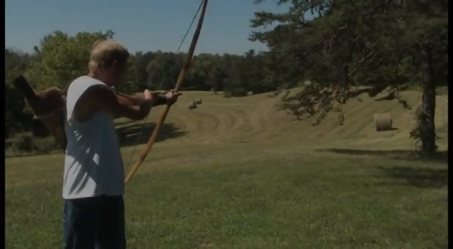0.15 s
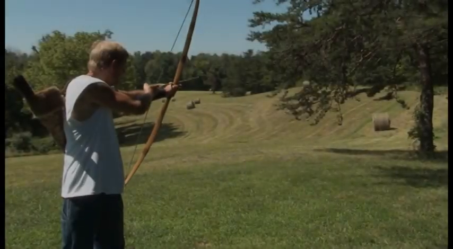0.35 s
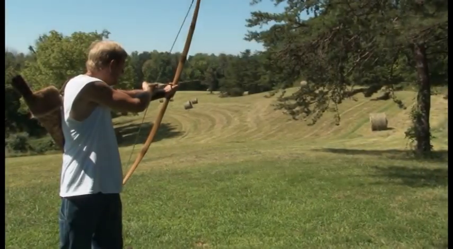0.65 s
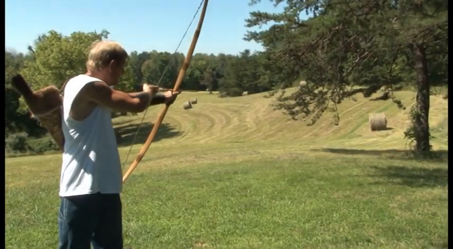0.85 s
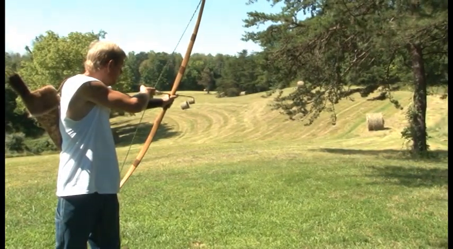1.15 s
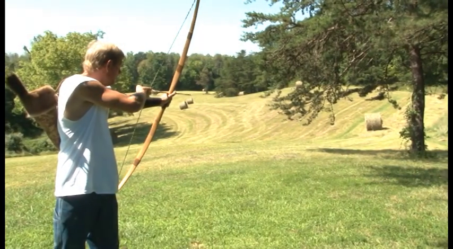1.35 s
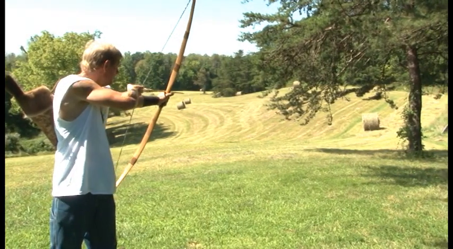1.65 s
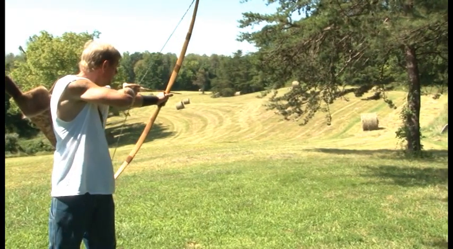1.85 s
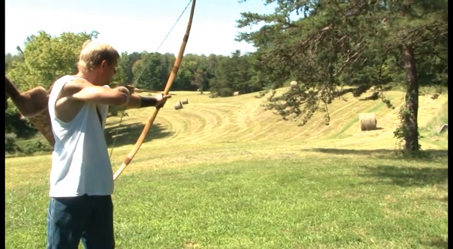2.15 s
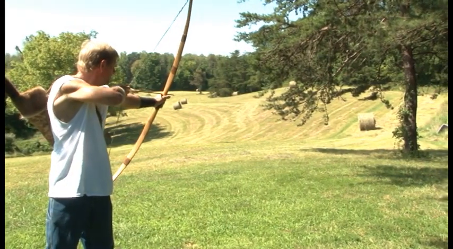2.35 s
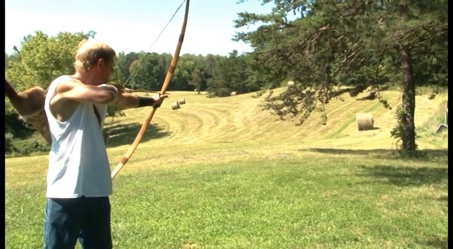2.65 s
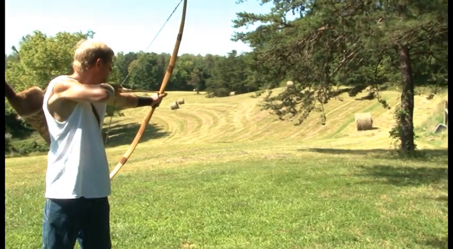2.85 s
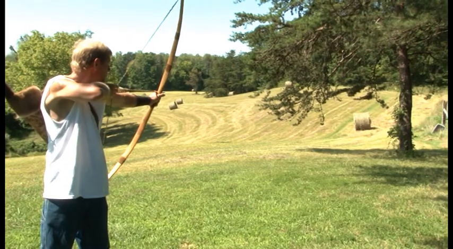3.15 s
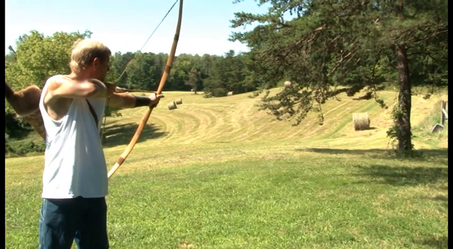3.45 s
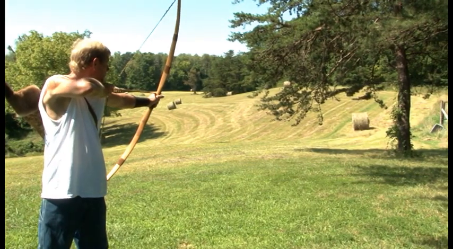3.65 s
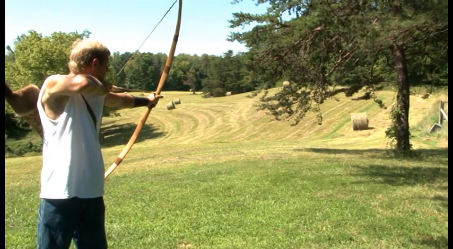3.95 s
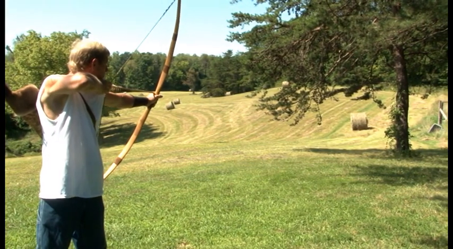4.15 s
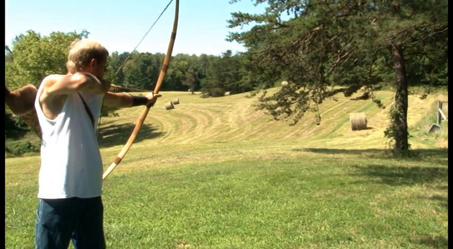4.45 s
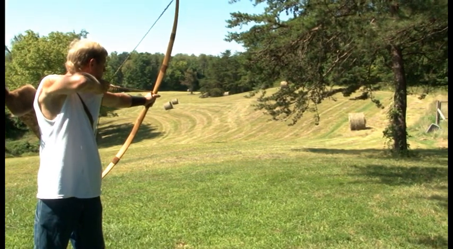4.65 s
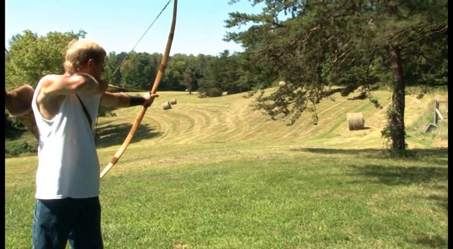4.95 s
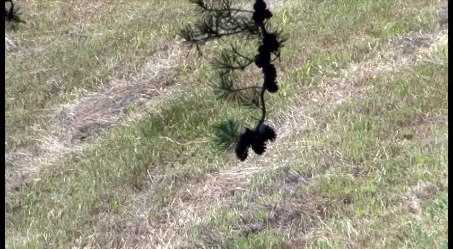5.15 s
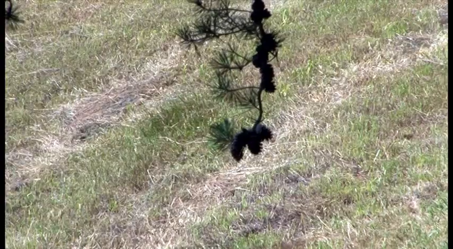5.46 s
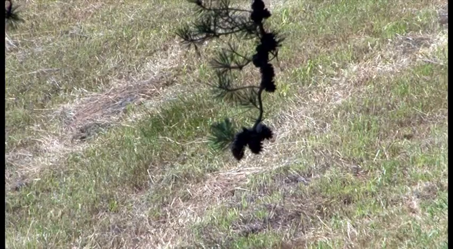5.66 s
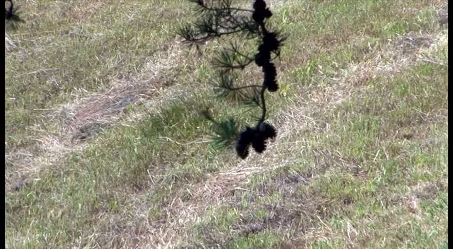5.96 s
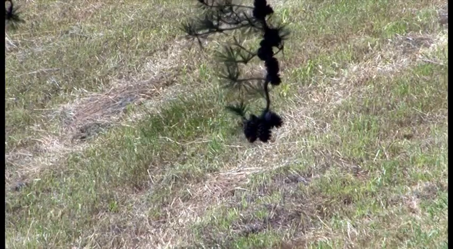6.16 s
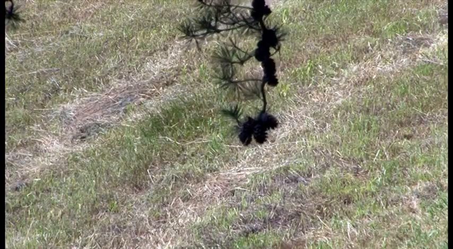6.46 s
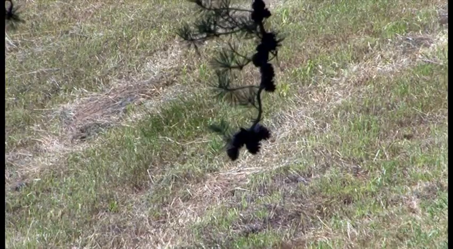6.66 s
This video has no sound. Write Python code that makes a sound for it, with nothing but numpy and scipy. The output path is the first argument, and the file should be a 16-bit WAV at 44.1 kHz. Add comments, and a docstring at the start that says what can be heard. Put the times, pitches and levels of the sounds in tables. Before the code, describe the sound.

A high chorus of insects swells in outdoors, with dull wind buffets on the microphone that ease near the end.

```python
"""A summer hayfield swells in: a wide cicada chorus hisses, one near cicada buzzes its drums, a katydid
rasps its wings and a camera's lens motor ticks faintly in its housing. An arrow swishes as it is drawn,
gusts rumble and thump on the microphone, and the katydid adds lone ticks. At 5.2 s the place changes:
the wind drops, far machinery drones and another cicada sings. Mono."""
import sys
import numpy as np
from scipy import signal
from scipy.fft import rfft, irfft
from scipy.io import wavfile
from scipy.ndimage import uniform_filter1d

SR = 44100
rng = np.random.default_rng(int(sys.argv[2]) if len(sys.argv) > 2 else 0)


def transcribe(signal):
    """Save signal, clipped to [-1, 1], as a 16-bit WAV file at the path in sys.argv[1]."""
    frames = np.atleast_2d(signal).T
    limited = np.clip(frames, -1, 1)
    pcm = np.round(limited * 32767).astype(np.int16)
    wavfile.write(sys.argv[1], SR, pcm)


N = 300556
T = np.arange(N) / SR
MOVE_S = 5.225   # change of place
AT_FIRST_PLACE = T < MOVE_S
FIRST_PLACE_FADE = np.clip((MOVE_S + 0.024 - T) / 0.041, 0, 1)   # quick crossfade, 1 to 0

# Opening swell: time_s, gain_db
FADE_IN = [(0, -28), (.38, -18.5), (.6, -14), (.85, -10.5), (1.07, -7), (1.25, -5), (1.4, -2.5)]
# Colour of the insect hiss at the first place: frequency_hz, level_db
FIRST_HISS = [(1120, -32.5), (1900, -30.5), (2590, -18), (2800, -17.5), (3580, -8.5), (4200, -10),
              (5190, -6.5), (5920, -6), (6520, -1), (7000, -3), (7780, -3.5), (8350, -5.5), (9040, -11.5),
              (9960, -11.5), (15600, -22)]


def from_db(db):
    """Gain of a level."""
    return 10 ** (np.asarray(db) / 20)


def rms_one(x):
    """Scale to unit rms."""
    return x / np.sqrt(np.mean(x ** 2) + 1e-20)


def in_time(rows):
    """Columns of a curve table, one value per sample."""
    times, *columns = np.transpose(rows)
    return [np.interp(T, times, column) for column in columns]


def noise(spectrum, low_hz=10, high_hz=20000):
    """Noise of the given colour between two steep edges; rms 1."""
    hz, points = np.fft.rfftfreq(N, 1 / SR) + .1, np.array(spectrum)
    colour = from_db(np.interp(np.log(hz), np.log(points[:, 0]), points[:, 1]))
    edge_loss = np.sqrt((1 + (low_hz / hz) ** 24) * (1 + (hz / high_hz) ** 24))
    return rms_one(irfft(rfft(rng.standard_normal(N)) * colour / edge_loss, N))


def drift(rate_hz):
    """A slow random wander; rms 1."""
    lowpass = signal.butter(2, rate_hz, fs=SR, output="sos")
    return rms_one(signal.sosfilt(lowpass, rng.standard_normal(N + SR))[SR:])


def evened(x, share):
    """Flatten part of a narrow noise's own swell, so that gusts set its shape."""
    envelope = uniform_filter1d(np.abs(signal.hilbert(x)), size=441)
    return rms_one(x / (envelope + 0.23) ** share)


def ring(clicks, hz, t60_s):
    """A unit click sets a sine of height 1 ringing."""
    decay, angle = from_db(-60 / (t60_s * SR)), 2 * np.pi * hz / SR
    return signal.lfilter([0, np.sin(angle)], [1, -2 * decay * np.cos(angle), decay ** 2], clicks + 1e-18)


def body(drive, modes):
    """Resonances in parallel, each passed twice for dark valleys; rms 1."""
    out = 0
    for k, (hz, width_hz, db) in enumerate(modes):
        t60_s = np.log(1000) / (np.pi * width_hz)
        out += (-1) ** k * from_db(db) * rms_one(ring(ring(drive, hz, t60_s), hz, t60_s))
    return rms_one(out)


def pulses(rate_hz, jitter_s):
    """One unit click per cycle, each a little early or late."""
    at = np.flatnonzero(np.diff(np.floor(np.cumsum(rate_hz) / SR)))
    slip = np.round(jitter_s * SR * rng.standard_normal(N)[at]).astype(int)
    clicks = np.zeros(N)
    clicks[np.clip(at + slip, 0, N - 1)] = 1
    return clicks


def echoed(x):
    """The direct sound and its early echoes off ground and branches; rms 1."""
    # Reflections: delay_s, gain_db
    echoes = [(.0021, -8.5), (.0047, 0.5), (0.0102, -32), (.0190, -24)]
    return rms_one(x + sum(from_db(db) * np.roll(x, round(delay_s * SR)) for delay_s, db in echoes))


def far_cicadas():
    """Countless far cicadas merge into smooth noise, in bands that flicker separately."""
    # Colour of the hiss at the second place: frequency_hz, level_db
    second_hiss = [(1120, -32), (1900, -31), (2540, -23.5), (2700, -19.5), (3340, -11), (4750, -7),
                   (5420, -7.5), (5920, -7), (6410, -5.5), (7000, -5), (7510, -1.5), (7920, -0.5),
                   (9360, -15.5), (14800, -22), (15600, -23)]
    skirt_db = np.where(AT_FIRST_PLACE, -13.5, -10)
    top_db = np.where(AT_FIRST_PLACE, -20, -19) + .8 * drift(30)
    out = np.zeros(N)
    for low_hz, high_hz, db in [(10, 4310, skirt_db), (4490, 8780, -0.33), (9900, 19400, top_db)]:
        gain = from_db(db + .5 * drift(9.7))
        first, second = noise(FIRST_HISS, low_hz, high_hz), noise(second_hiss, low_hz, high_hz)
        out += gain * np.where(AT_FIRST_PLACE, first, second)
    return out + from_db(-11) * ~AT_FIRST_PLACE * noise(second_hiss, 9270, 10650)


def near_cicada():
    """Two drums click into a resonant body and throb as they beat against each other."""
    # Pace of the drums: time_s, click_rate_hz, throb_rate_hz
    pace = [(0, 363.7, 46.8), (2.3, 363, 47), (3.1, 361.5, 47.2), (3.7, 357, 47.6), (4.3, 349, 47.4),
            (4.8, 339, 46), (5.2, 332, 45.5)]
    # Level relative to the chorus: time_s, level_db
    levels = [(0, -9), (1.2, -7), (2.5, -8), (3.4, -6), (4.0, -11.5), (4.5, -10), (5.2, -20)]
    # Body resonances: pitch_hz, width_hz, level_db
    modes = [(5370, 590, 4), (5850, 140, 2), (6650, 790, -9), (7200, 840, 10.5)]
    click_hz, throb_hz = in_time(pace)
    throb = (.5 + .5 * np.cos(2 * np.pi * np.cumsum(throb_hz) / SR)) ** 4.3 + 0.042
    clicks = pulses(click_hz * (1 + .001 * drift(4)), jitter_s=.000012)
    clicks *= throb * (1 + 0.13 * rng.standard_normal(N))
    return from_db(in_time(levels)[0]) * echoed(body(clicks, modes))


def second_cicada():
    """A steady buzz: the left drum clicks and the right follows, softer, into the same body."""
    # Body resonances: pitch_hz, width_hz, level_db
    modes = [(5750, 500, -5), (7080, 360, 2.5), (7470, 210, -0.5), (8330, 560, -4), (9220, 330, -4.5),
             (10500, 900, -25)]
    click_hz, right_lag_s = 185.5, 0.0029
    left = pulses(click_hz * (1 + .0006 * drift(2.2)), jitter_s=.00001)
    left *= 1 + 0.15 * rng.standard_normal(N)
    right = 0.46 * np.roll(left, round(right_lag_s * SR))
    return from_db(-4.5 + 1.2 * drift(0.52)) * echoed(body(left + right, modes))


def chorus():
    """Far cicadas, one close singer at each place, a cricket and the air, all riding one level curve."""
    # Chorus level, one list per place: time_s, level_db
    levels = [
        [(0, -30), (1.4, -29.5), (1.67, -28.5), (2.25, -29), (3.2, -29.5), (4.8, -30), (5.2, -30)],
        [(5.24, -33), (6.8, -33.5)],
    ]
    gain = from_db(in_time(sum(levels, []))[0] + in_time(FADE_IN)[0])
    hiss = far_cicadas()
    singer = np.where(AT_FIRST_PLACE, near_cicada(), second_cicada())
    return gain * (hiss + singer + cricket() + air_murmur())


def wind_strength():
    """An eddying breeze and gusts add in power; gives the gains of heave, rumble, flutter and buffet."""
    # Breeze, one list per place: time_s, rumble_db, flutter_db
    breeze = [
        [(0, -66, -75), (.56, -61, -65.5), (.65, -50.5, -60), (.9, -52, -59), (1.1, -48, -50),
         (1.65, -51, -46.5), (1.85, -40.5, -46), (2.2, -43, -51.5), (2.7, -42, -55), (3.3, -48, -51),
         (3.5, -40.5, -44), (3.73, -57, -49), (3.8, -44, -49), (4.0, -51.5, -49), (4.15, -40.5, -47),
         (4.24, -52, -50), (4.6, -56, -51.5), (4.8, -50, -49), (5.2, -42.5, -51)],
        [(5.25, -51, -58), (5.6, -52, -65), (6.05, -56, -65), (6.5, -53, -66), (6.8, -56, -56)],
    ]
    # Gusts: centre_s, length_s, heave_db, rumble_db, flutter_db
    gusts = [(0.14, 0.03, -55, -64, -64), (0.254, 0.027, -51, -47.5, -58), (0.371, 0.053, -48, -45.5, -46),
             (0.612, 0.037, -51, -58, -57), (0.882, 0.084, -60, -42.5, -61),
             (1.278, 0.056, -37, -33.5, -56), (1.804, 0.067, -39, -44, -53), (2.004, .035, -38, -22, -32.5),
             (2.04, 0.019, -20, -15.5, -30.5), (2.087, 0.037, -35, -40, -50), (2.321, 0.025, -35, -33, -52),
             (2.346, 0.033, -45, -42, -50), (2.512, 0.03, -38, -37, -55), (2.91, 0.022, -47, -40, -59),
             (2.998, 0.022, -37, -38, -42), (3.173, 0.065, -32, -28, -43.5),
             (3.565, 0.016, -46, -25.5, -42), (3.647, .045, -30, -39, -45), (3.862, 0.074, -32, -35, -51),
             (3.934, 0.02, -37, -36, -43.5), (4.077, 0.054, -33.5, -32, -44),
             (4.151, 0.057, -35, -34, -41.5), (4.422, 0.038, -54, -40.5, -49.5),
             (4.824, 0.071, -35, -40.5, -53), (4.956, 0.051, -36, -32, -54),
             (5.115, 0.072, -28, -26, -41.5), (5.213, 0.019, -34, -25, -30),
             (5.397, 0.028, -43, -45, -55.5), (5.845, 0.039, -49, -48, -61),
             (6.298, 0.054, -37.5, -61, -56), (6.468, 0.17, -42, -43.5, -57)]
    eddy_db, eddy_hz = 4, 8.8
    rise, fall = 0.99, 0.65   # shares of its length: a gust builds slowly and stops short
    low_db, breeze_flutter_db = in_time(sum(breeze, []))
    steady_db = [low_db, low_db, breeze_flutter_db, -64 + in_time(FADE_IN)[0]]
    eddies_db = [share * eddy_db * drift(eddy_hz) for share in (1.2, 0.9, 0.37, .6)]
    power = from_db(np.add(steady_db, eddies_db)) ** 2
    for centre_s, length_s, heave_db, rumble_db, flutter_db in gusts:
        span = slice(max(round((centre_s - 2 * length_s) * SR), 0), round((centre_s + 2 * length_s) * SR))
        age_s = T[span] - centre_s
        half_width_s = length_s / 2 * np.where(age_s < 0, rise, fall)
        fade_db = np.interp(centre_s, *np.transpose(FADE_IN))
        buffet_db = 1.07 * (flutter_db - fade_db + 16.5) - 31.5 + fade_db   # grows faster than flutter
        peak_power = from_db([heave_db, rumble_db, flutter_db, buffet_db]) ** 2
        power[:, span] += peak_power[:, None] * .5 ** ((age_s / half_width_s) ** 2)
    return np.sqrt(power)


def wind():
    """Pressure noise on the microphone, from low to high: heave, rumble, flutter and buffet."""
    # Colour of the low wind: frequency_hz, level_db
    colour = [(7.1, -34), (12, 4), (54, 3), (71, -3), (160, -17), (210, -43), (350, -120)]
    gains = wind_strength()
    lumps = from_db(1.43 * drift(14.7))
    heave = evened(noise(colour, high_hz=48), share=.6)
    rumble = evened(noise(colour, 48, 110), share=.6)
    first_flutter = noise([(100, 2), (240, -7.5), (500, -23)], 111, 228.7)
    second_flutter = noise([(100, 4.5), (170, -3.5), (300, -22)], 105, 200)
    flutter = FIRST_PLACE_FADE * first_flutter + (1 - FIRST_PLACE_FADE) * second_flutter
    flutter = evened(flutter, share=0.094)
    buffet = evened(noise([(260, -1), (450, -13.5), (700, -32.5), (1500, -36)], low_hz=271.5), share=0.14)
    return np.sum(gains * [heave, lumps * rumble, lumps * flutter, buffet], axis=0)


def thumps():
    """Eddies breaking on the microphone port, and handling knocks: a pressure swing in a dull puff."""
    # Thumps: centre_s, level_db, pitch_hz, t60_s
    hits = [(1.988, -34, 345, 0.025), (1.996, -22, 228, 0.024), (2.004, -13.5, 150, 0.023),
            (2.022, -46, 533, 0.014), (2.032, -13, 55, 0.035), (2.145, -43.5, 572, 0.014),
            (2.311, -31, 70, 0.034), (2.876, -51.5, 300, .03), (3.002, -41.5, 354, 0.023),
            (3.08, -49, 350, .022), (3.562, -42, 330, 0.021), (3.807, -44, 330, 0.028),
            (4.096, -43, 334, 0.056), (4.133, -46, 315, .04), (5.112, -42, 300, 0.031),
            (5.203, -46, 290, 0.059)]
    puff = noise([(200, 6.5), (550, 4), (800, -14), (1500, -17.5), (2500, -69)], low_hz=202)
    out, attack_s = np.zeros(N), 0.014
    for centre_s, db, hz, t60_s in hits:
        span = slice(round((centre_s - .05) * SR), round((centre_s + .15) * SR))
        age_s = T[span] - centre_s
        envelope = from_db(db - 60 * np.where(age_s < 0, -age_s / attack_s, age_s / t60_s))
        puff_gain = 1.12 * min(hz / 500, 1) ** 1.88   # higher thumps are breathier
        out[span] += envelope * (np.sin(2 * np.pi * hz * age_s) + puff_gain * puff[span])
    return out


def katydid():
    """A wing file rasps in quick strokes and gives lone ticks, at the first place only."""
    # Rasp level before the opening swell: time_s, level_db
    levels = [(0, -43), (.6, -47.5), (1.1, -44.5), (1.37, -40), (1.78, -47), (2.45, -47.5), (2.6, -43),
              (3.63, -46), (3.85, -42.5), (3.88, -52), (4.8, -48), (5.2, -43.5)]
    # Lone ticks: centre_s, level_db
    ticks = [(3.064, -42.5), (3.838, -40), (4.012, -43), (4.212, -38), (4.315, -50), (4.413, -39),
             (4.524, -39), (4.640, -39), (4.760, -42)]
    # Wing resonances: pitch_hz, width_hz, level_db
    wing_modes = [(9550, 790, 3), (10700, 1100, -8), (11550, 1000, -4)]
    stroke_hz, tick_t60_s = 111, 0.056
    strokes = 1 + 0.45 * np.cos(2 * np.pi * stroke_hz * T)
    gain = from_db(in_time(levels)[0] + in_time(FADE_IN)[0]) * AT_FIRST_PLACE
    rasp = gain * strokes * noise(FIRST_HISS, 9020, 10640)
    tick_envelope = sum((T >= s) * from_db(db - 60 * np.abs(T - s) / tick_t60_s) for s, db in ticks)
    return rasp + tick_envelope * body(rng.standard_normal(N), wing_modes)


def arrow_swish():
    """An airy rustle as the arrow is drawn: a brief swell of the highest treble."""
    centre_s, half_length_s, level_db = 1.36, 0.12, -50
    envelope = from_db(level_db) * np.exp(-((T - centre_s) / half_length_s) ** 2)
    return envelope * noise([(9000, -8), (12000, 0), (15500, -4)], low_hz=9500)


def lens_motor():
    """Each motor step knocks the housing; on a reversal its strongest mode sings longer."""
    # Motor runs: start_s, end_s, start_db, end_db
    runs = [(0, .9, -84, -67), (2.31, 4.92, -59, -60.5), (5.224, 5.65, -59, -60.5),
            (5.93, 6.82, -57.5, -60)]
    # Housing modes, strongest first: pitch_hz, level_db, t60_s
    modes = [(962, 7, 0.042), (1060, 4.5, 0.045), (757, 0, 0.037), (1180, -20, 0.03)]
    # Reversal whines: time_s, peak_db, t60_s
    whines = [(2.369, -57, 0.084), (2.488, -57, 0.11), (5.408, -51.5, 0.068), (6.016, -60, 0.15),
              (6.341, -58, 0.1)]
    step_hz, first_step_s, gear_play_s = 29.97, .0197, 0.00011
    at = (np.arange(first_step_s, N / SR, 1 / step_hz) * SR).astype(int)
    at = np.minimum(at + np.round(rng.normal(0, gear_play_s * SR, len(at))).astype(int), N - 1)
    gain = sum(from_db(np.interp(T[at], [on, off], ramp_db, -200, -200)) for on, off, *ramp_db in runs)
    scatter_db = rng.normal(0, 2.2, (len(at), len(modes)))
    out = np.zeros(N)
    for k, (hz, db, t60_s) in enumerate(modes):
        clicks = np.zeros(N)
        clicks[at] = gain * from_db(db + scatter_db[:, k])
        push = np.hanning(130) / 65 * np.sin(2 * np.pi * hz * np.arange(130) / SR)   # a soft 3 ms step
        out += ring(2 * np.convolve(clicks, push)[40:N + 40], hz, t60_s)
    for time_s, db, t60_s in whines:
        out += from_db(db - 60 * np.abs(T - time_s - .01) / t60_s) * np.sin(2 * np.pi * modes[0][0] * T)
    return out


def far_machinery():
    """At the second place an engine drones on multiples of its turning rate and fades as it moves off."""
    turn_hz, fade_db_per_s = 24.6, 2.5
    turns = np.cumsum(turn_hz * (1 + .004 * drift(1.4))) / SR
    drone = np.zeros(N)
    for harmonic, db in [(3, -48.5), (4, -63), (5, -54.5), (6, -58.5)]:
        drone += from_db(db + 2.5 * drift(2.5)) * np.sin(2 * np.pi * (harmonic * turns + rng.random()))
    return (1 - FIRST_PLACE_FADE) * from_db(-fade_db_per_s * (T - MOVE_S)) * drone


def cricket():
    """A thin whistle at the first place: noise through one narrow resonance."""
    pitch_hz, width_hz = 3958, 22
    return from_db(-25) * AT_FIRST_PLACE * body(rng.standard_normal(N), [(pitch_hz, width_hz, 0)])


def air_murmur():
    """A low, flickering murmur of open air under the insects."""
    # Colour of the air: frequency_hz, level_db
    colour = [(120, -47), (200, 3.5), (273, -9), (310, -10), (455, -2), (654, -5), (2400, -14), (3120, -41),
              (5280, -120)]
    return from_db(np.where(AT_FIRST_PLACE, -32.5, -26.5) + 1.2 * drift(28)) * noise(colour)


def scene():
    """All sources on one microphone, copied to both channels."""
    mix = chorus() + katydid() + arrow_swish() + wind() + far_machinery() + thumps() + lens_motor()
    return np.tile(mix, (2, 1))


def record(dry):
    """A steep low-pass cuts the very top."""
    stopband_hz = 15850
    return signal.sosfilt(signal.cheby2(14, 60, stopband_hz, fs=SR, output="sos"), dry)


dry = scene()
out = record(dry)
transcribe(out)
```